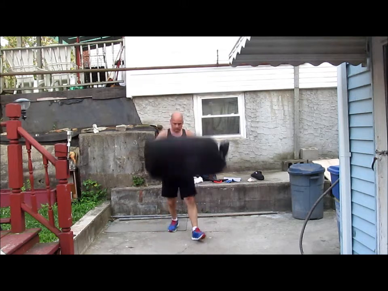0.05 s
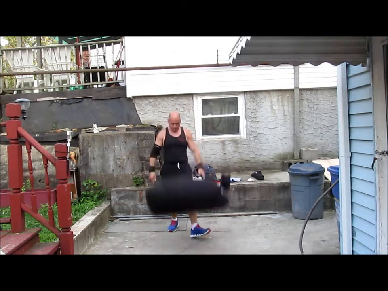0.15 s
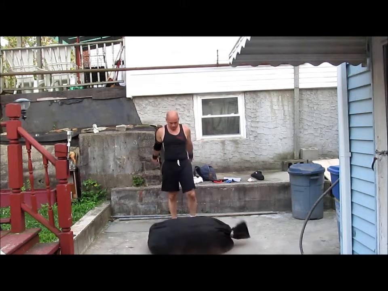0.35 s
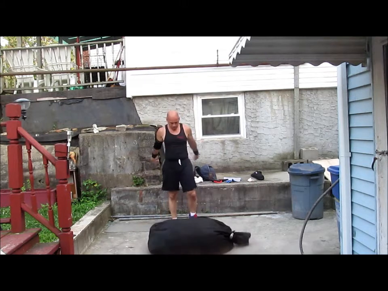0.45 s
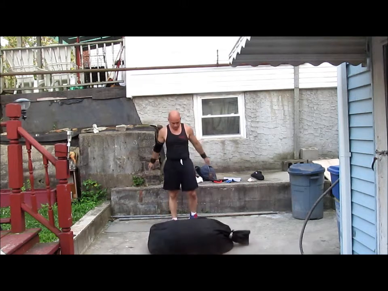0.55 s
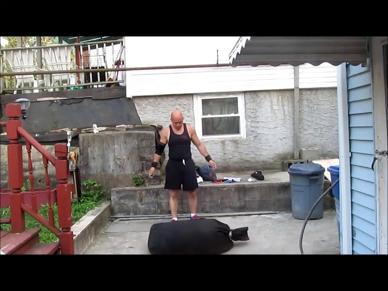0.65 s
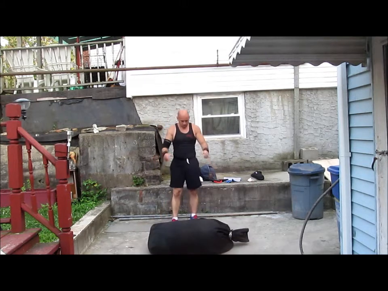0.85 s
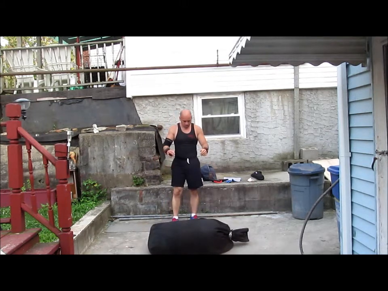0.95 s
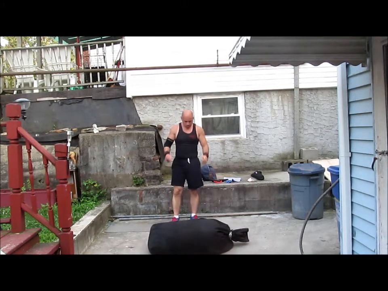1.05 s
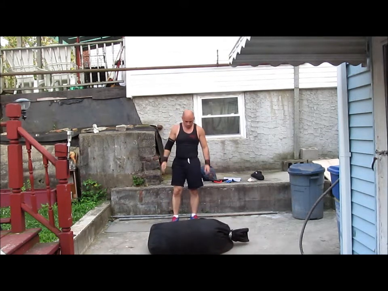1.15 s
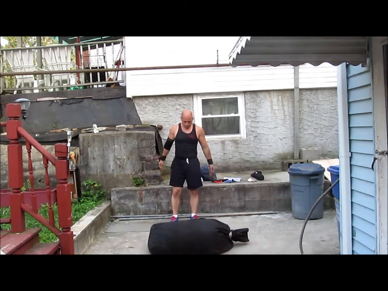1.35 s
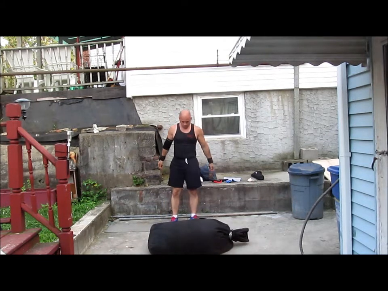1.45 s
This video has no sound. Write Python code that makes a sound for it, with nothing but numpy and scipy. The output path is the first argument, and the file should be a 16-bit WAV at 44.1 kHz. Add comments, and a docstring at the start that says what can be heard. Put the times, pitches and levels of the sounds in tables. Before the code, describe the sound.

One loud thud of a sandbag dropped in a concrete yard: the cloth swishes as it slips, then hits with a slightly distorted slap and sandy crunch. A faint town rumble drops away after the impact and creeps back.

```python
"""A walled concrete yard: a heavy sandbag slides out of a man's arms and lands flat.
Friction makes the cloth swish; the impact sends out a pressure pulse and excites damped modes,
a slap and a thud. The sand crunches, the walls reverberate and the bag's loose neck flops down.
The blow overloads the microphone; its gain control ducks the distant town, which slowly swells back."""
import sys
import numpy as np
from scipy import signal
from scipy.fft import rfft, irfft
from scipy.io import wavfile
from scipy.ndimage import uniform_filter1d, minimum_filter1d

SR = 44100
rng = np.random.default_rng(int(sys.argv[2]) if len(sys.argv) > 2 else 0)


def wrap_up_sound(samples):
    """Save the sound to the file named by the first command line argument, as 16-bit audio."""
    columns = np.atleast_2d(samples).T
    # keep every value between -1 and 1, then stretch to whole-number steps
    tamed = np.clip(columns, -1, 1)
    steps = np.round(tamed * 32767).astype(np.int16)
    wavfile.write(sys.argv[1], SR, steps)


N = 66150
IMPACT_S = .2286


def amp(db):
    """Decibels to amplitude ratio."""
    return 10 ** (np.asarray(db) / 20)


def per_bin(points):
    """Interpolation of a table over log frequency, at every FFT bin."""
    hz, value = np.transpose(points)
    return np.interp(np.log(np.fft.rfftfreq(N, 1 / SR) + 1), np.log(hz + 1), value)


def since(start_s):
    """Seconds after the start, zero before it."""
    return np.maximum(np.arange(N) / SR - start_s, 0)


def envelope(start_s, rise_s, hold_s, t60_s):
    """Linear attack, hold and exponential decay of 60 dB in t60_s."""
    t = since(start_s)
    return np.minimum(t / rise_s, 1) * amp(-60 * np.maximum(t - hold_s, 0) / t60_s)


def band_decay(sound, t60_table, rise_s, hold_s):
    """Frequency-dependent damping: from the impact on, each band decays at its own rate."""
    spectrum, out = rfft(sound), 0
    for k, (_, t60_s) in enumerate(t60_table):
        band = per_bin([(hz, float(j == k)) for j, (hz, _) in enumerate(t60_table)])
        out = out + irfft(spectrum * band, N) * envelope(IMPACT_S, rise_s, hold_s, t60_s)
    return out


# Likeness of left and right: frequency_hz, correlation
COHERENCE = [(60, 0.97), (300, 0.96), (600, 0.95), (1100, 0.68), (2000, 0.65), (4000, .56), (12000, .58)]

def noise(spectrum, grain_db=0):
    """Partly coherent stereo noise, nearly mono in the bass; unit rms, so the spectrum sets shape only."""
    hz = np.fft.rfftfreq(N, 1 / SR)
    grains = amp(grain_db * np.repeat(rng.standard_normal(N // 16 + 1), 16)[:N])
    mid, side = rfft(rng.standard_normal((2, N)) * grains)
    correlation = np.clip(per_bin(COHERENCE), -1, 1)
    mid, side = mid * np.sqrt(1 + correlation), side * np.sqrt(1 - correlation)
    subsonic_cut = hz ** 2 / (hz ** 2 + 300)
    stereo = irfft(np.array([mid + side, mid - side]) * amp(per_bin(spectrum)) * subsonic_cut, N)
    return stereo / np.sqrt(np.mean(stereo ** 2))


# Spectra of the distant town and its traffic drone: frequency_hz, density_db
RUMBLE_SPECTRUM = [(15, -29), (25, -9.5), (59, -7.5), (118, -7.5), (207, -8), (286, -5), (326, -9),
                   (558, -12), (690, -14), (850, -19.5), (1600, -26), (3260, -39.5), (6900, -49),
                   (10000, -62.5), (12000, -78), (15000, -90)]
DRONE_SPECTRUM = [(95, -40.5), (115, -11), (126, 1), (140, -11), (163, -3), (190, -26.5), (400, -60.5)]

def town():
    """Stationary noise from far away: a broad rumble and the narrow-band drone of traffic."""
    return amp(-36.5) * noise(RUMBLE_SPECTRUM) + amp(-41) * noise(DRONE_SPECTRUM)


# Spectra of sliding cloth and of the weave leaving the grip: frequency_hz, density_db
SWISH_SPECTRUM = [(35, -48.5), (60, -21.5), (105, -16.5), (135, -2), (170, -5.5), (210, -15.5), (273, -11),
                  (394, -15), (653, -8), (881, -13), (2000, -14), (3660, -19), (6800, -30), (8000, -35.5),
                  (14500, -51.5)]
RASP_SPECTRUM = [(300, -23), (1500, -4.5), (3000, 0.5), (6000, -5.5), (9000, -9), (14200, -9), (15500, -31)]

def cloth():
    """Sliding friction: the bag rasps out of the grip and swishes down past the body."""
    swish = noise(SWISH_SPECTRUM) * envelope(0, rise_s=.0044, hold_s=.063, t60_s=.68)
    rasp = noise(RASP_SPECTRUM, grain_db=1.5) * envelope(.004, rise_s=.0034, hold_s=.0097, t60_s=.2)
    return amp(-32.5) * swish + amp(-33.5) * rasp


def air_push(length_s=.0037):
    """Displacement: air squeezed out just before contact makes one brief pressure swing."""
    progress = np.minimum(since(IMPACT_S - length_s) / length_s, 1)
    return -amp(-22) * np.sin(np.pi * progress ** 2)


# Early reflections off the ground and near walls: delay_s, relative_level_db
REFLECTIONS = [(.0072, -2.5), (.0139, -5.5), (.0196, -11), (.0266, -8.5)]

def slap(compression_s=.00074):
    """Impulsive radiation: a compression and its rarefaction arrive directly, then by reflection."""
    direct = (.0006, .0086)
    out = np.zeros(N)
    for delay_s, level_db in [direct, *REFLECTIONS]:
        age = since(IMPACT_S + delay_s) / compression_s
        attack = 1 - np.exp(-6 * age)
        out += amp(2 + level_db) * attack * (1 - age) * np.exp(-age)
    return out


# Modes of the bag and the air around it: pitch_hz, relative_level_db, t60_s
BAG_MODES = [(45, -28, .34), (74.3, -12, 0.094), (129.6, -19.5, 0.16), (150.7, -12.5, 0.11),
             (301, -19.5, 0.15), (329, -20, 0.11), (422, -20.5, 0.12), (491.3, -20.5, .15), (563, -25, 0.1),
             (669, -19.5, 0.12), (706, -4.5, 0.029), (788, -23.5, .14), (911, -24.5, .14),
             (1136, -27, 0.21), (1422, -25, .15), (1605, -27, 0.11), (1746, -24.5, .13)]

def thud():
    """Damped free vibration: the landing excites modes that each build up over half a cycle."""
    t = since(IMPACT_S)
    return sum(amp(level_db) * envelope(IMPACT_S, .5 / hz, 0, t60_s) * np.sin(2 * np.pi * hz * t)
               for hz, level_db, t60_s in BAG_MODES)


# Spectrum of sand against cloth: frequency_hz, density_db
CRUNCH_SPECTRUM = [(40, -14), (200, -11.5), (450, -1), (650, -3), (1000, -4.5), (1700, -5), (3500, -6.5),
                   (5500, -13.5), (8000, -21), (11000, -29), (15000, -41.5)]
# Its decay times: frequency_hz, t60_s
CRUNCH_DECAY = [(100, 0.36), (600, 0.22), (2000, .125), (5000, 0.087), (12000, 0.063)]

def crunch():
    """Granular friction: sand packs against the cloth as the bag flattens, bright at first, then dull."""
    grains = noise(CRUNCH_SPECTRUM, grain_db=1.5)
    return amp(-15.5) * band_decay(grains, CRUNCH_DECAY, rise_s=.00079, hold_s=.008)


# Spectrum of the yard's diffuse field: frequency_hz, density_db
YARD_SPECTRUM = [(20, -15.5), (36, -0.5), (76, -13), (163, -5), (216, -8.5), (330, -9.5), (750, -19),
                 (1050, -20), (1600, -16.5), (3500, -23.5), (6900, -31.5), (11000, -42.5), (15000, -52)]
# Its reverberation times: frequency_hz, t60_s
YARD_DECAY = [(60, .55), (250, .5), (1000, .48), (4000, 0.42), (12000, .33)]

def yard():
    """Reverberation: a diffuse field builds up between the walls and dies away, treble first."""
    return amp(-28.5) * band_decay(noise(YARD_SPECTRUM), YARD_DECAY, rise_s=.035, hold_s=0)


# Spectrum of a flick of cloth: frequency_hz, density_db
FLICK_SPECTRUM = [(500, -22), (2000, -1), (3800, 5), (7000, -20), (14000, -35)]
# Flicks of the bag's neck: start_s, level_db
NECK_FLICKS = [(.463, -35), (.510, -41)]

def neck():
    """Light impacts: the loose neck of the bag flops down in faint, quickly damped noise bursts."""
    bursts = sum(amp(level_db) * envelope(start_s, rise_s=.003, hold_s=0, t60_s=.04)
                 for start_s, level_db in NECK_FLICKS)
    return noise(FLICK_SPECTRUM) * bursts


# Level difference of the landing between channels: frequency_hz, left_minus_right_db
LANDING_BALANCE = [(60, 2), (400, 0), (1000, 1.2), (2000, -2), (4000, -1), (12000, 1)]

def scene():
    """Superposition: the slide, the landing and the settling neck add to the town's background."""
    landing = amp(22) * (air_push() + slap() + thud() + crunch() + yard())
    channel_gains = amp(np.outer([.5, -.5], per_bin(LANDING_BALANCE)))
    landing = irfft(rfft(landing) * channel_gains, N)
    return town() + cloth() + landing + neck()


def gain_control(dry, limit_db=-6, sense_s=.0071, hold_s=.38, recovery_db_per_s=15):
    """Limiting: gain drops at once when short-term power passes the limit, holds, then recovers."""
    power = uniform_filter1d((dry ** 2).mean(0), int(sense_s * SR))
    excess_db = np.maximum(10 * np.log10(abs(power) + 1e-12) - limit_db, 0)
    window = 2 * int(hold_s * SR / 2) + 1
    held_db = -minimum_filter1d(-excess_db, window, origin=window // 2, mode="constant")  # trailing peak
    recovery_db = np.arange(N) / SR * recovery_db_per_s
    duck_db = np.maximum.accumulate(held_db + recovery_db) - recovery_db
    return dry * amp(-uniform_filter1d(duck_db, size=64))


# Steady noise of the microphone's electronics: frequency_hz, density_db
SELF_NOISE_SPECTRUM = [(20, -0.5), (50, 0), (80, -10), (300, -13.5), (700, -13.5), (1400, -26), (2800, -30),
                       (5600, -39.5), (8000, -51), (11000, -62), (15000, -76)]

def record(dry):
    """Overload: the ducked sound and unducked self-noise clip at full scale, then are band-limited."""
    clipped = np.clip(gain_control(dry) + amp(-60.5) * noise(SELF_NOISE_SPECTRUM), -1, 1)
    lowpass = signal.firwin(255, cutoff=15600, window=("kaiser", 8), fs=SR)
    return signal.oaconvolve(clipped, lowpass[None], "same")


dry = scene()
out = record(dry)
wrap_up_sound(out)
```